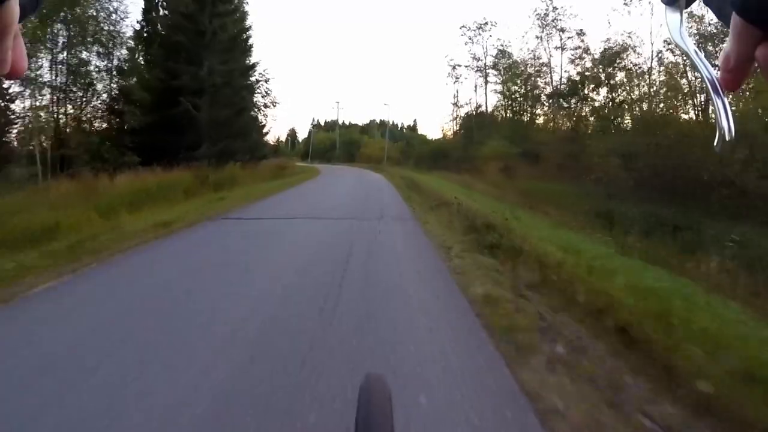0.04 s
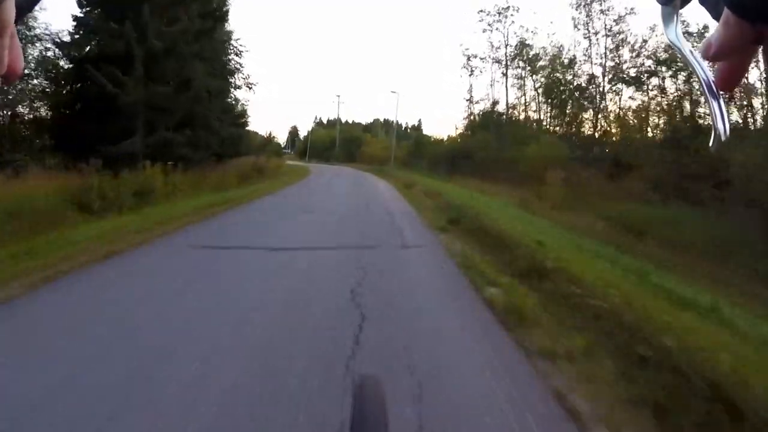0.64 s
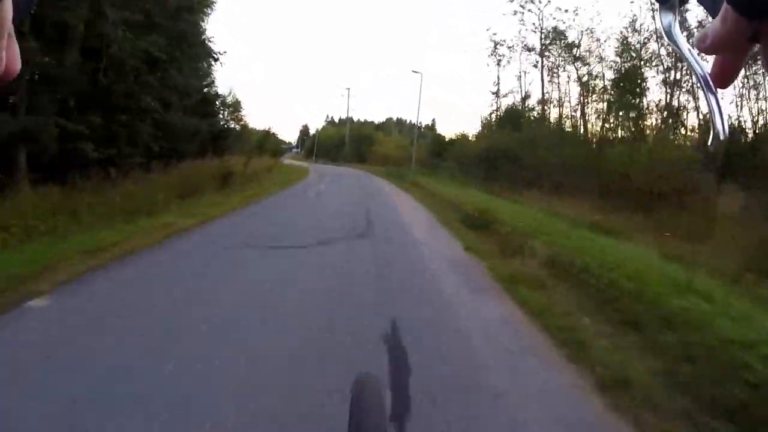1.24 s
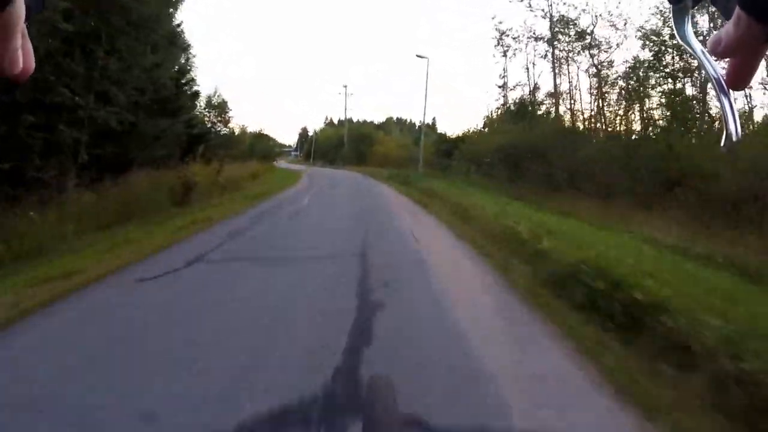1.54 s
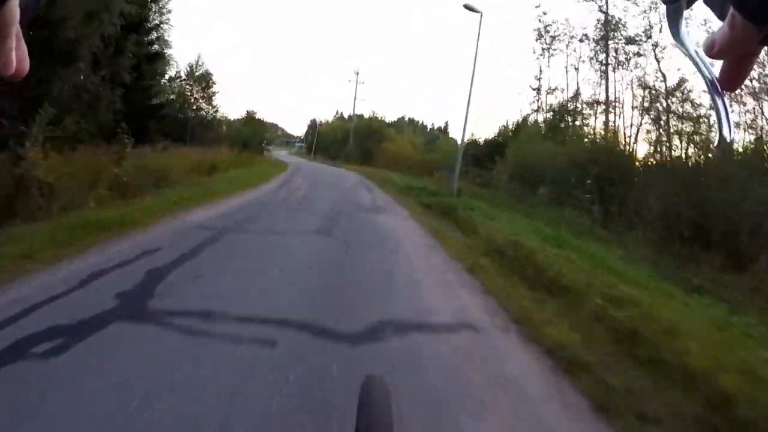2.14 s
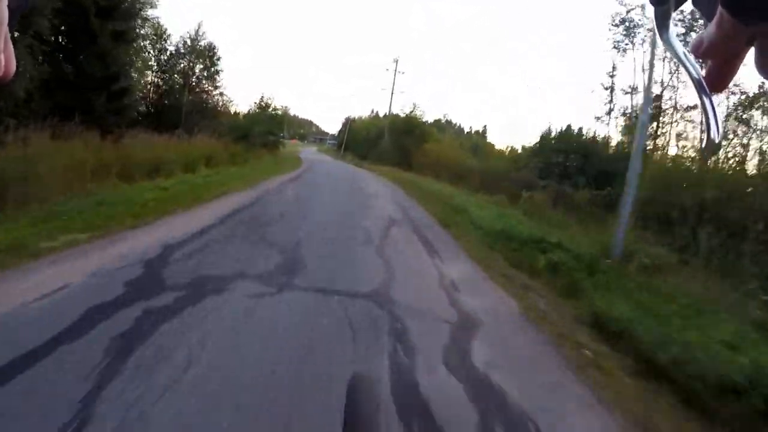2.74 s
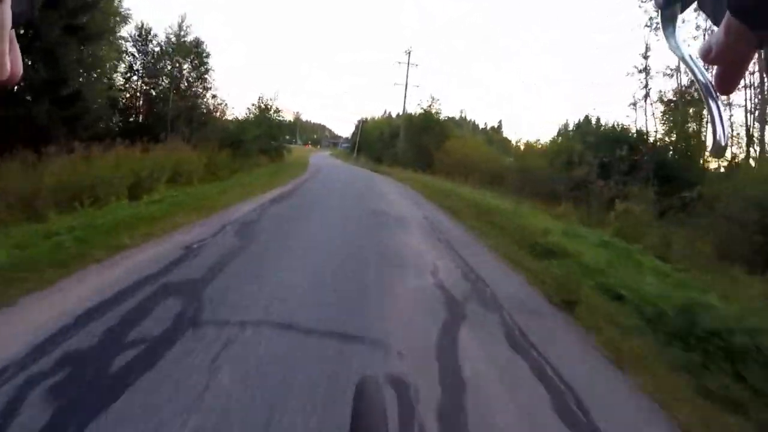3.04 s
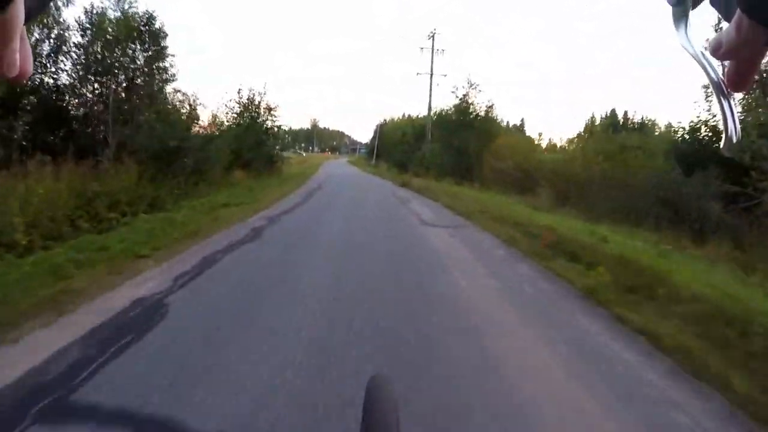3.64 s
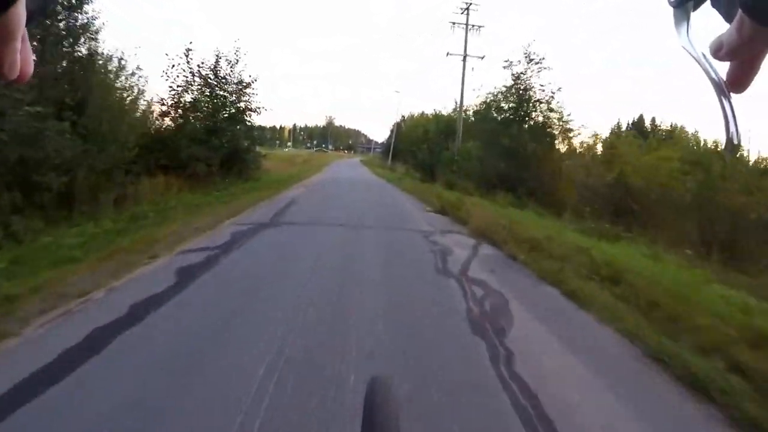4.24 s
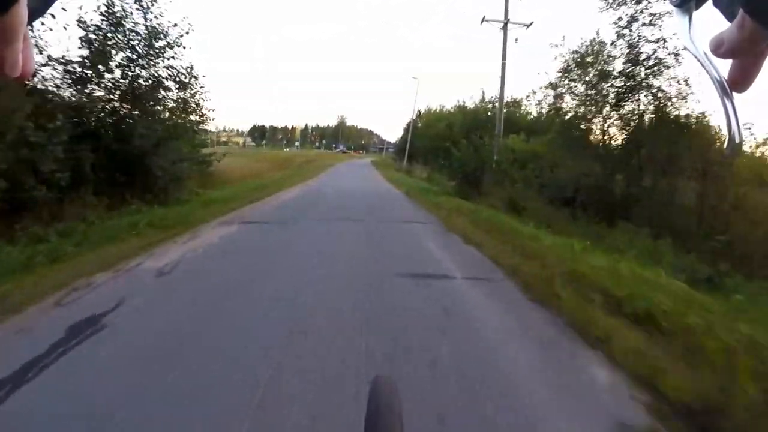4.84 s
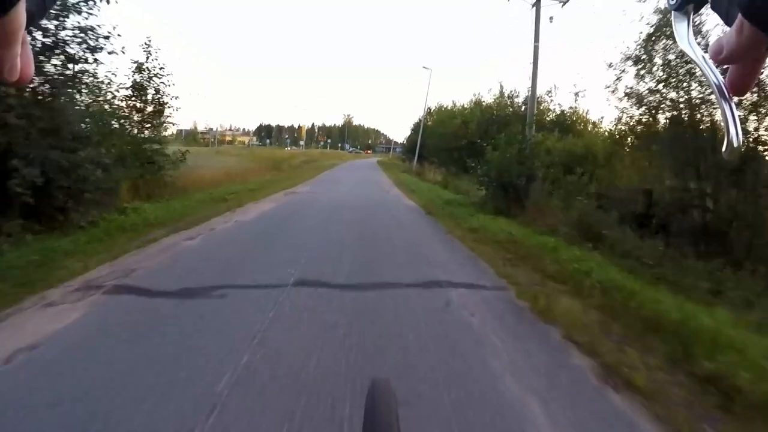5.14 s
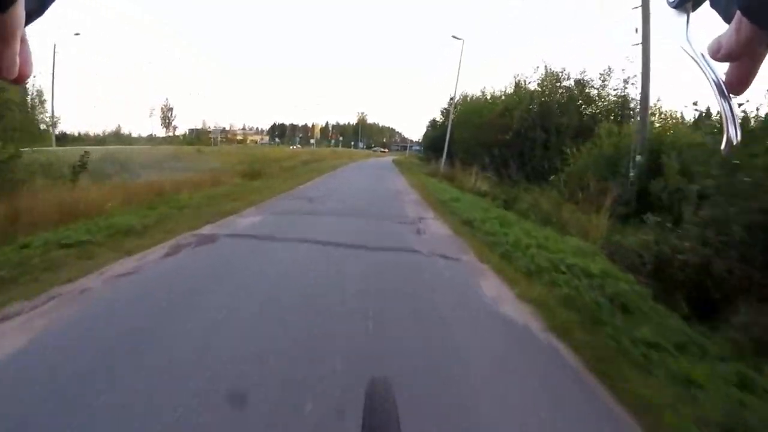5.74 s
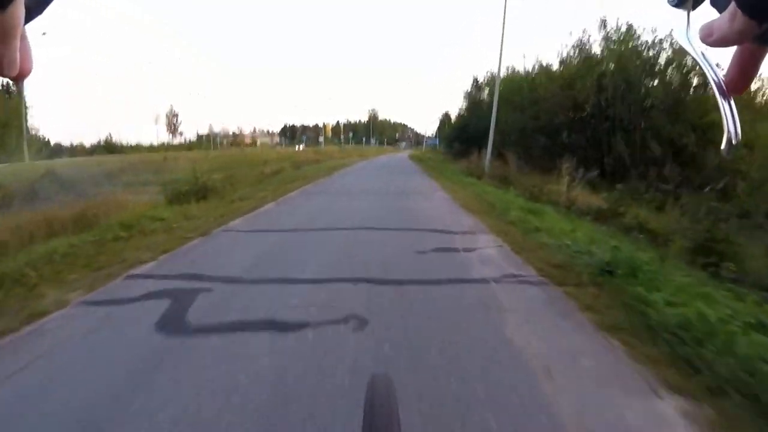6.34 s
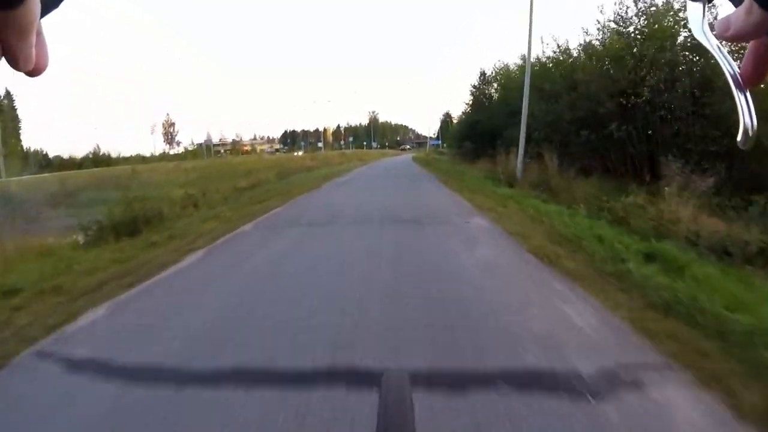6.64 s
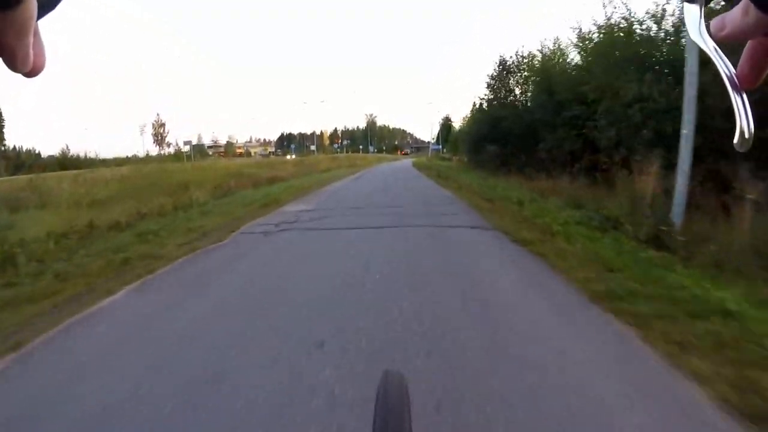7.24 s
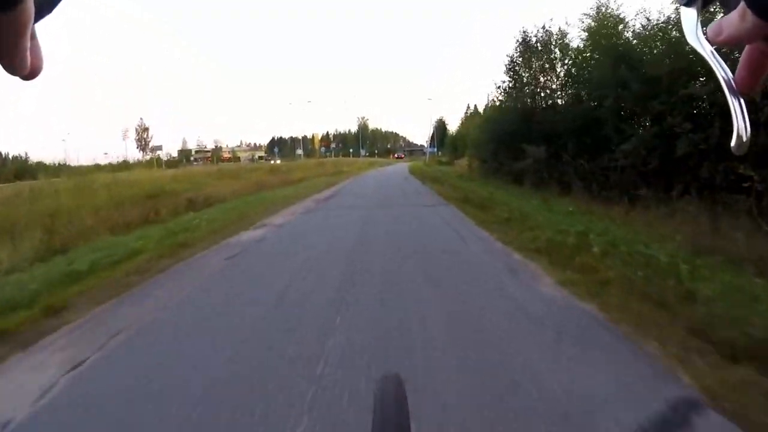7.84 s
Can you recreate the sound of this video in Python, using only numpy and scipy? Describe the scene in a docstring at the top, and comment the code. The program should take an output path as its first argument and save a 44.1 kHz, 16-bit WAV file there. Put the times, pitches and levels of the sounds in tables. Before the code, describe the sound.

A bicycle coasts along an asphalt path, heard from a closed camera housing on the handlebar. Wind and road vibration make a steady low rumble, under a dull tyre roar and a wavering hum from the mount. The freewheel purrs faintly on top, slowing slightly. Small metallic ticks, dull clacks and grit poke through at irregular moments, and bumps give short knocks, with a cluster near the end.

```python
"""On an asphalt path, inside a closed camera housing on the handlebar of a coasting bicycle.
Wind and road shake the frame into a low rumble, the tyres roar and set the mount humming, and the
housing muffles the rush of air. The freewheel purrs on top, slowing a little. Sharp metallic ticks
and dull clacks poke through faintly, louder pawl clicks and grit among them. Bumps knock through
the fork, and a limiter holds the level."""
import sys
import numpy as np
from scipy import signal
from scipy.fft import rfft, irfft, next_fast_len
from scipy.io import wavfile
from scipy.ndimage import uniform_filter1d, minimum_filter1d

SR = 44100
rng = np.random.default_rng(int(sys.argv[2]) if len(sys.argv) > 2 else 0)


def dump_mix(stems):
    """Bounce the given channels to the path in sys.argv[1] as a 16-bit WAV at rate SR."""
    frames = np.atleast_2d(stems).T  # one column per channel
    limited = np.clip(frames, -1, 1)  # hard clip at full scale
    pcm = np.round(limited * 32767).astype(np.int16)
    wavfile.write(sys.argv[1], SR, pcm)


N = 352359


def from_db(db):
    """Decibels to gain."""
    return 10 ** (np.asarray(db) / 20)


def rms_one(x):
    """Scale to rms 1."""
    return x / np.sqrt(np.mean(x ** 2) + 1e-20)


def automation(rows):
    """One curve for each value column of a (time, values...) table, read at every sample."""
    times, *columns = np.transpose(rows)
    return [np.interp(np.arange(N) / SR, times, column) for column in columns]


def swells(events):
    """A bell-shaped fader move in dB for each (centre time, length, change) row."""
    t = np.arange(N) / SR
    return sum(db * np.exp(-(2 * (t - centre) / length) ** 2) for centre, length, db in events)


def band(x, low_hz, high_hz, order=2):
    """Causal band-pass."""
    edges = np.clip([low_hz, high_hz], 10, .45 * SR)
    return signal.sosfilt(signal.butter(order, edges, "band", fs=SR, output="sos"), x + 1e-18)


def drift(rate_hz):
    """Smooth random modulation, rms 1, mostly slower than the given rate."""
    hz = np.fft.rfftfreq(N, 1 / SR)
    return rms_one(irfft(rfft(rng.standard_normal(N)) / (1 + (hz / rate_hz) ** 2), N))


def throb(rate_hz):
    """An uneven wobble between -1 and 1, at about the given rate."""
    hz = np.fft.rfftfreq(N, 1 / SR)
    around_rate = np.exp(-(2 * (hz / rate_hz - 1)) ** 2)
    return np.tanh(rms_one(irfft(rfft(rng.standard_normal(N)) * around_rate, N)))


def coloured(spectrum):
    """Noise shaped by an EQ curve of (frequency, level) rows, rms 1."""
    hz, db = np.transpose(spectrum)
    size = next_fast_len(N)
    bin_hz = np.fft.rfftfreq(size, 1 / SR)
    gain = from_db(np.interp(np.log(bin_hz + 1), np.log(hz), db))
    return rms_one(irfft(rfft(rng.standard_normal(size)) * gain, size)[:N])


def shaken(modes, skirt, force=1):
    """Resonances, each driven by its own noise and rolled off about `skirt` widths out; rms 1."""
    out = np.zeros(N)
    for hz, width, db in modes:
        radius = np.exp(-np.pi * width / SR)
        feedback = [1, -2 * radius * np.cos(2 * np.pi * hz / SR), radius * radius]
        mode = signal.lfilter([1, 0, -1], feedback, force * rng.standard_normal(N))
        reach = 1 + skirt * width / hz
        out += from_db(db) * rms_one(band(mode, hz / reach, hz * reach))
    return rms_one(out)


def levelled(x, span_s, amount):
    """Ride the gain against the signal's own swells (amount 0 to 1); rms 1."""
    size = max(int(span_s * SR), 2)
    power = uniform_filter1d(uniform_filter1d(x * x, size), size)
    return rms_one(x / (np.abs(power) + 1e-6) ** (amount / 2))


def clicks(events):
    """One impulse for each (time, level) row."""
    out = np.zeros(N)
    for start, db, *_ in events:
        out[int(start * SR)] += from_db(db)
    return out


def bursts(impulses, t60):
    """Each impulse fires a puff of noise that falls 60 dB in t60 seconds."""
    envelope = signal.lfilter([1], [1, -from_db(-60 / (t60 * SR))], impulses + 1e-18)
    return envelope * rng.standard_normal(N)


def ring(impulses, hz, t60):
    """Each impulse strikes a decaying sine of its own height."""
    radius, angle = from_db(-60 / (t60 * SR)), 2 * np.pi * hz / SR
    feedback = [1, -2 * radius * np.cos(angle), radius * radius]
    return signal.lfilter([0, np.sin(angle)], feedback, impulses + 1e-18)


def placed(sounds):
    """Lay (time, samples) pairs on the timeline."""
    out = np.zeros(N + SR)
    for start, sound in sounds:
        first = int(start * SR)
        out[first:first + len(sound)] += sound
    return out[:N]


# sub-bass resonances of the frame: (frequency [Hz], width [Hz], relative level [dB])
FRAME_MODES = [(50.6, 9, 0.5), (41.2, 35, -6.5), (69.7, 20, -7)]
# the frame's rumble ducks briefly: (centre time [s], length [s], change [dB])
FRAME_DIPS = [(0.40, 0.028, -5.5), (0.70, 0.087, -14.5), (1.25, 0.11, -5), (1.50, 0.062, -12),
              (1.88, 0.052, -11), (2.01, 0.074, -9.5), (2.92, .08, -8.5), (3.10, 0.044, -3.5),
              (3.33, 0.18, -0.5), (3.66, 0.058, -13), (4.70, 0.031, -9), (5.08, .05, -4.5),
              (5.35, 0.1, -5.5), (5.89, .06, -9), (6.22, 0.06, -6.5), (6.76, .12, -3.5), (7.1, 0.079, -9.5),
              (7.44, 0.031, -8.5), (7.53, 0.077, -4.5), (7.62, 0.044, -13.5), (7.815, 0.046, -20.5)]
# bass resonances of the fork: (frequency [Hz], width [Hz], relative level [dB])
FORK_MODES = [(112.4, 9, -1.5), (114.3, 35, -9)]
# the fork's drone sinks for a moment: (centre time [s], length [s], change [dB])
FORK_DIPS = [(0.05, 0.34, -6), (0.4, 0.13, -10), (0.57, 0.073, -12), (0.69, 0.057, -15.5),
             (0.84, 0.099, -9), (1.09, 0.053, -18.5), (1.37, 0.17, -6), (1.66, 0.086, -2),
             (2.14, 0.066, -10), (2.39, 0.052, -16.5), (2.62, 0.15, -15), (3.04, 0.056, -5.5),
             (3.65, 0.24, -9.5), (4.04, 0.084, -11.5), (4.45, 0.081, -5), (4.83, 0.12, -16.5),
             (4.97, 0.089, -9.5), (5.21, .06, -14), (5.64, 0.33, -12.5), (6.14, 0.048, -9),
             (6.44, 0.14, -10.5), (6.66, 0.13, -13), (7.37, 0.059, -8), (7.79, 0.11, -23)]
# the fork judders: (centre time [s], length [s], boost [dB])
FORK_JUDDERS = [(1.74, 0.036, 7.5), (5.34, 0.17, 7)]

def frame_rumble():
    """The low end: wind and road shake frame and fork; now and then the fork judders louder while the frame's
    rumble ducks."""
    judder_db = swells(FORK_JUDDERS)
    buffeting_db = 0.8 * drift(rate_hz=12)
    frame_db = -31.5 + buffeting_db + swells(FRAME_DIPS) - 0.7 * judder_db
    fork_db = -37 + 2.5 * throb(rate_hz=4.2) + swells(FORK_DIPS) + judder_db
    frame = levelled(shaken(FRAME_MODES, skirt=2.2), span_s=0.056, amount=1.0)
    fork = levelled(shaken(FORK_MODES, skirt=1.2), span_s=0.068, amount=0.9)
    return from_db(frame_db) * frame + from_db(fork_db) * fork


# broad resonance of the mount: (frequency [Hz], width [Hz], relative level [dB])
MOUNT_MODES = [(399.8, 36, 0)]
# slow fader ride on the hum: (time [s], level [dB])
HUM_SWELL = [(0, -37), (1.2, -38), (1.7, -37.5), (2.3, -38.5), (3.3, -37.5), (3.75, -38), (4.3, -36.5),
             (4.8, -38.5), (5.2, -36), (5.4, -36), (5.6, -38), (6.15, -34.5), (6.6, -39), (7.1, -36.5),
             (7.7, -39), (7.97, -43)]
# the hum sinks for a moment: (centre time [s], length [s], change [dB])
HUM_DIPS = [(0.07, 0.11, -10), (0.36, 0.21, -4), (0.78, .15, -7), (1.23, 0.31, -6), (1.48, 0.044, -5),
            (1.62, 0.055, -7.5), (1.87, 0.098, -11), (2.12, 0.039, -7.5), (2.32, 0.087, -11.5),
            (2.47, 0.049, -6.5), (2.65, 0.1, -7), (2.98, 0.082, -13), (3.13, 0.12, -9), (3.48, 0.17, -16),
            (3.88, 0.078, -5), (4.22, 0.041, -14), (4.34, 0.037, -11.5), (4.5, 0.11, -8),
            (4.71, 0.03, -8.5), (5.93, 0.15, -5), (6.3, 0.06, -11), (6.51, 0.037, -2.5), (6.88, 0.098, -7),
            (7.2, 0.039, -13), (7.6, 0.038, -3.5)]

def mount_hum():
    """Road buzz keeps one narrow resonance of the mount singing: a wavering tone over a rough skirt."""
    swell_db, = automation(HUM_SWELL)
    hum_db = swell_db + swells(HUM_DIPS) + 2.25 * throb(rate_hz=5.7)
    pitch_hz = 394.6 + 4 * drift(rate_hz=14)
    tone = np.sqrt(2) * np.sin(2 * np.pi * np.cumsum(pitch_hz) / SR)
    roughness = from_db(-5) * shaken(MOUNT_MODES, skirt=5.0)
    return from_db(hum_db) * rms_one(tone + roughness)


# coarseness of the asphalt: (time [s], relative roar level [dB], relative hiss level [dB])
ROAD_TEXTURE = [(0, -42.5, -71.5), (0.58, -42, -69), (0.75, -44.5, -71.5), (1.25, -45.5, -74.5),
                (1.57, -43, -70), (2.1, -45, -73), (3.0, -45, -73), (3.4, -45.5, -73), (3.9, -42.5, -70.5),
                (4.6, -41, -68.5), (4.9, -43, -72.5), (5.45, -42.5, -68.5), (5.9, -45, -73),
                (6.3, -44.0, -70.5), (6.6, -47, -75), (7.15, -44, -71), (7.97, -44.5, -73)]
# midrange body of tyre and wheel: (frequency [Hz], width [Hz], relative level [dB])
WHEEL_MODES = [(315, 65, 4.5), (472, 82, -0.5), (575.8, 10, -2), (653.2, 32, -2.5), (710, 60, -9),
               (847.6, 12, -18)]
# upper-mid colour of the housing: (frequency [Hz], width [Hz], relative level [dB])
HOUSING_MODES = [(1664, 42, 3.5), (1863, 220, 2), (2330, 270, -12.5), (2490, 160, -17)]

def tyres(roar_db, hiss_db):
    """The grain of the asphalt drives the wheel into a roar and the housing into a spurting hiss."""
    roar = shaken(WHEEL_MODES, skirt=1.7, force=from_db(0.6 * drift(rate_hz=44)))
    hiss = shaken(HOUSING_MODES, skirt=4.0, force=from_db(1.9 * drift(rate_hz=81)))
    return from_db(roar_db - 0.3) * roar + from_db(hiss_db - 4.0) * hiss


# dark EQ curve of air heard through the housing: (frequency [Hz], relative level [dB])
WIND_SPECTRUM = [(15, 8.5), (120, 3.5), (180, -3.5), (260, 0), (520, -6), (760, -22), (900, -23.5),
                 (1100, -23.5), (1320, -31), (1520, -39), (2700, -51), (4200, -67), (9000, -62.5),
                 (12000, -69)]

def wind(roar_db):
    """Air rushes past the housing, swelling with the tyre roar and gusting on its own."""
    swell_db = 1.2 * (roar_db - np.mean(roar_db))
    gust_db = 2 * drift(rate_hz=7.2)
    return from_db(-43 + swell_db + gust_db) * coloured(WIND_SPECTRUM)


# bright ring of small metal parts: (frequency [Hz], relative level [dB], decay t60 [s])
METAL_MODES = [(4860, -10.5, 0.045), (5266, -7, 0.041), (5440, -5.5, 0.018), (6030, -5, 0.0098),
               (6520, -4.5, .016), (6870, -0.5, 0.019), (7500, -9.5, 0.055), (8100, -7.5, 0.036),
               (8320, -12.5, 0.022)]

def metal_ring(hits):
    """Every hit strikes each mode of the metal with a random strength, so the colour keeps shifting."""
    return sum(ring(hits * rng.standard_normal(N), hz, t60) * from_db(db) for hz, db, t60 in METAL_MODES)


# pace of the ratchet as the wheel slows: (time [s], click rate [1/s])
FREEWHEEL_RATE = [(0, 60.2), (1, 59.87), (2, 59.46), (3, 59.32), (4, 58.12), (5, 57.7), (6, 57.37),
                  (7, 57.14), (8, 54.7)]

def freewheel(hiss_db):
    """The pawl drops off each ratchet tooth: a fast metallic purr that also knocks on the housing."""
    clicks_per_s, = automation(FREEWHEEL_RATE)
    slack_teeth = 0.11 * drift(rate_hz=25)   # play in the ratchet nudges clicks early or late
    teeth_passed = np.floor(np.maximum.accumulate(np.cumsum(clicks_per_s) / SR + slack_teeth))
    drops = np.diff(teeth_passed, prepend=teeth_passed[0])
    level_db = -75 + 0.86 * (hiss_db - np.mean(hiss_db)) + 2 * throb(rate_hz=2.8)
    accent_db = 5.5 * np.tanh(rng.standard_normal(N))
    hits = drops * from_db(level_db + accent_db)
    crack = band(bursts(hits, t60=0.046), 5200, 7800)
    knock = band(bursts(hits, t60=0.028), 2050, 2650, order=3)
    return from_db(-13) * metal_ring(hits) + from_db(-4) * crack + from_db(14) * knock


# sharp metallic ticks: (time [s], relative level [dB], band centre [Hz], decay t60 [s])
METALLIC_TICKS = [(0.04, -66, 6400, 0.027), (0.263, -69.5, 6500, .025), (0.298, -72, 6200, .025),
                  (0.465, -73, 6000, 0.027), (0.483, -72, 6400, .025), (0.5143, -63, 6800, .03),
                  (0.532, -68, 6950, .025), (0.624, -61, 5750, 0.063), (0.652, -75, 6200, .03),
                  (0.716, -66, 6400, .03), (1.3314, -69, 6240, 0.027), (1.4654, -75, 6140, .03),
                  (1.544, -63.5, 6100, 0.04), (1.634, -69, 7060, .05), (1.87, -67.5, 6100, .03),
                  (2.157, -72.5, 5670, .04), (2.182, -68.5, 5850, .04), (2.348, -68, 6300, .025),
                  (2.54, -75, 5800, 0.025), (2.6077, -72.5, 5800, .03), (2.907, -66.5, 5700, 0.047),
                  (3.15, -68, 6200, 0.03), (3.3648, -65.5, 5350, .03), (3.422, -64, 6930, .03),
                  (3.606, -63.5, 6500, .03), (3.7804, -69, 6300, .03), (3.816, -67, 6100, .025),
                  (3.885, -68, 6200, .03), (3.899, -75, 6200, .025), (3.935, -65.5, 6400, .025),
                  (4.162, -66.5, 6000, 0.028), (4.33, -65.5, 6500, 0.034), (4.466, -73, 6200, .025),
                  (4.516, -65.5, 6560, 0.033), (4.677, -71, 6600, .03), (4.694, -64, 6700, .03),
                  (4.759, -66.5, 7500, .03), (4.914, -68.5, 6300, 0.03), (4.939, -69, 5600, .03),
                  (5.037, -66.5, 5800, .03), (5.2295, -68, 6600, .025), (5.276, -69.5, 5600, .03),
                  (5.295, -66.5, 5950, .025), (5.4006, -63, 6000, .03), (5.643, -63.5, 5800, .03),
                  (5.686, -71, 5800, 0.023), (5.868, -67, 6060, 0.028), (5.912, -69, 6000, .025),
                  (5.963, -70, 6200, 0.033), (6.066, -73, 6000, .025), (6.152, -73, 6200, .03),
                  (6.2557, -67, 5960, .03), (6.276, -68.5, 6500, .025), (6.298, -67, 6500, .025),
                  (6.552, -73, 5600, .03), (6.7615, -68, 6300, .03), (6.9355, -67.5, 5860, 0.028),
                  (7.042, -71, 5500, .03), (7.065, -69, 6000, .025), (7.097, -69, 6200, .025),
                  (7.1464, -62.5, 6740, 0.045), (7.6126, -69.5, 5500, 0.034), (7.718, -65, 5900, 0.033),
                  (7.751, -68, 6200, .025), (7.7772, -69.5, 6000, .03), (7.9399, -66, 6650, 0.033)]

def metallic_ticks(hiss_db):
    """Sharp ticks, louder pawl clicks among them, ring and knock on the housing over a fine sizzle."""
    t = np.arange(SR // 5) / SR
    cracks = []
    for start, db, hz, t60 in METALLIC_TICKS:
        puff = from_db(db - 60 * t / t60) * rng.standard_normal(len(t))
        cracks.append((start, band(puff, hz / 1.1, hz * 1.1)))
    hits = clicks(METALLIC_TICKS)
    knock = band(bursts(hits, t60=0.034), 1900, 2700, order=3)
    sizzle = rms_one(band(rng.standard_normal(N), 5200, 7200)) * from_db(hiss_db - np.mean(hiss_db))
    ticks = from_db(-10) * metal_ring(hits) + from_db(2) * placed(cracks) + from_db(6.5) * knock
    return ticks + from_db(-92) * sizzle


# bumps in the asphalt: (time [s], relative level [dB], pitch [Hz])
BUMP_HITS = [(0.060, -37, 540), (0.496, -30, 510), (0.591, -30, 560), (0.613, -23.5, 422),
             (1.756, -40, 450), (2.336, -25.5, 442), (3.032, -28, 445), (3.247, -25, 476),
             (3.280, -29, 450), (3.832, -30, 436), (3.887, -27, 567), (4.066, -33.5, 572),
             (4.403, -30, 515), (4.631, -26, 464), (4.729, -40, 544), (5.145, -35, 436), (5.631, -31, 562),
             (6.481, -37, 476), (7.624, -29.5, 444), (7.808, -25.5, 430), (7.870, -21.5, 466),
             (7.896, -27, 465), (7.914, -26.5, 463)]
# partials of the knocked wheel: (ratio to pitch [x], relative level [dB], decay t60 [s])
KNOCK_MODES = [(.85, -2.5, 0.015), (1, 4.5, 0.041), (1.25, -5.5, 0.02)]

def bumps():
    """Each bump rings the wheel briefly at its own pitch; the soft tyre rounds off the attack."""
    t = np.arange(SR // 5) / SR
    partials = []
    for start, hit_db, pitch_hz in BUMP_HITS:
        for ratio, db, t60 in KNOCK_MODES:
            envelope = from_db(hit_db + db - 60 * t / t60)
            partials.append((start, envelope * np.sin(2 * np.pi * pitch_hz * ratio * t)))
    return from_db(-7) * band(placed(partials), 390, 680, order=4)


def scattered(hiss_db, per_s, floor_db, spread_db):
    """A spray of impulses of random size and timing, denser on coarse asphalt."""
    fired = rng.random(N) < per_s * from_db(hiss_db - np.mean(hiss_db)) / SR
    level_db = floor_db + spread_db * np.minimum(rng.exponential(1, N), 2.4)
    return fired * from_db(level_db)


# dull clacks through the housing, from the freewheel pawl and grit: (time [s], relative level [dB])
DULL_CLACKS = [(0.3646, -56), (0.449, -60), (0.466, -59), (0.482, -58), (0.531, -57.5), (0.623, -56.5),
               (1.4653, -54), (1.5435, -51.5), (1.6317, -51), (2.902, -57.5), (3.8157, -55), (4.4657, -62),
               (4.4977, -58), (4.676, -58), (5.127, -56), (5.452, -54), (5.642, -64), (5.962, -67),
               (6.2555, -54.5), (6.476, -61), (6.551, -65), (7.064, -55.5), (7.146, -59)]
# shorter snaps of the finest grains: (time [s], relative level [dB])
GRAIN_SNAPS = [(0.426, -69), (0.623, -62), (1.031, -65), (1.678, -65.5), (2.997, -72), (4.358, -65),
               (4.771, -62), (6.276, -65), (7.153, -61)]

def clacks_and_crackle(hiss_db):
    """Pawl and grit clack dully through the plastic housing; fine grains snap and sand crackles."""
    hits = clicks(DULL_CLACKS) + scattered(hiss_db, per_s=35, floor_db=-71.5, spread_db=3.0)
    clacks = band(bursts(hits, t60=0.024), 1950, 2550, order=3)
    snaps = band(bursts(clicks(GRAIN_SNAPS), t60=0.015), 1500, 3500, order=3)
    sand = scattered(hiss_db, per_s=5.2, floor_db=-68.5, spread_db=2.5)
    crackle = band(bursts(sand, t60=0.004), 2800, 3900)
    return from_db(8.5) * clacks + from_db(2) * snaps + crackle


# notches where the mount passes little vibration: (frequency [Hz], width [Hz])
MOUNT_NOTCHES = [(616, 15), (1170, 34), (1530, 37), (2050, 59)]

def through_mount(x):
    """Between two modes of the mount their motions cancel and carve a notch."""
    for hz, width in MOUNT_NOTCHES:
        x = signal.lfilter(*signal.iirnotch(hz, hz / width, fs=SR), x)
    return x


def scene():
    """The mono mix: a bed of rumble, hum, tyres and air with small hits on top, coloured by the mount."""
    roar_db, hiss_db = automation(ROAD_TEXTURE)
    bed = frame_rumble() + mount_hum() + tyres(roar_db, hiss_db) + wind(roar_db)
    hits = clacks_and_crackle(hiss_db) + bumps() + freewheel(hiss_db) + metallic_ticks(hiss_db)
    return through_mount(bed + hits)[None, :]


def limiter(x, threshold_db, release_db_per_s, strength):
    """The gain ducks just ahead of each peak by a share (strength) of the overshoot, then recovers."""
    over_db = strength * np.maximum(20 * np.log10(np.abs(x) + 1e-9) - threshold_db, 0)
    release_ramp = release_db_per_s * np.arange(N) / SR
    cut_db = np.maximum.accumulate(over_db + release_ramp, axis=-1) - release_ramp
    gain_db = minimum_filter1d(-cut_db, size=300)   # look-ahead and hold
    smooth_db = uniform_filter1d(uniform_filter1d(gain_db, size=200), size=200)
    return x * from_db(smooth_db)


def record(dry):
    """The master chain: a limiter, then a steep high cut that is 60 dB down at 12650 Hz."""
    held = limiter(dry, threshold_db=-22.5, release_db_per_s=85.5, strength=0.69)
    high_cut = signal.cheby2(12, 60, 12650, fs=SR, output="sos")
    return signal.sosfilt(high_cut, held)


dry = scene()
out = record(dry)
dump_mix(out)
```